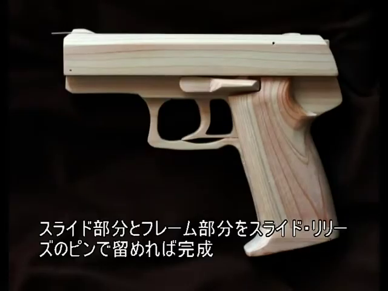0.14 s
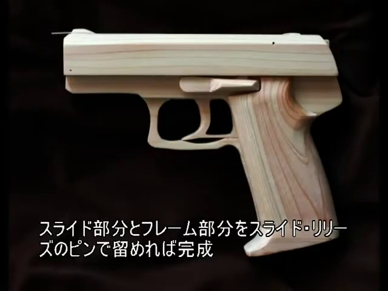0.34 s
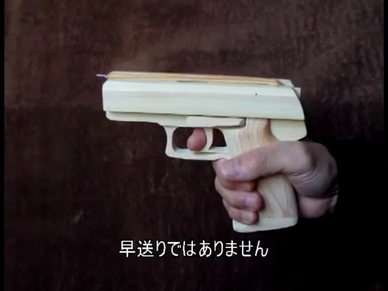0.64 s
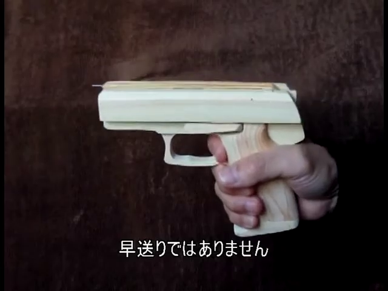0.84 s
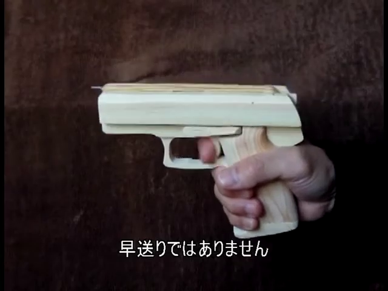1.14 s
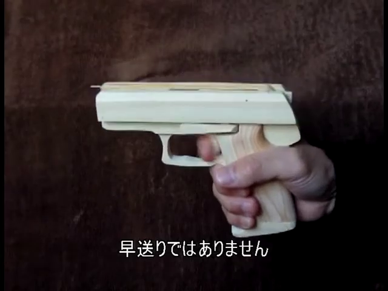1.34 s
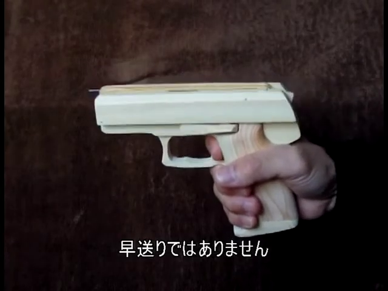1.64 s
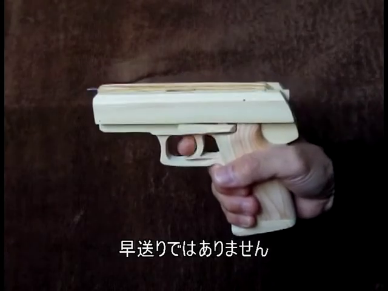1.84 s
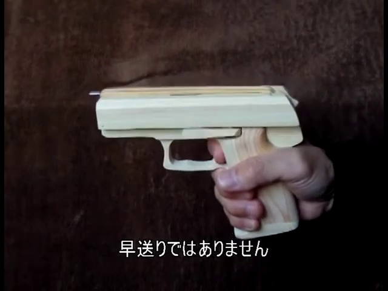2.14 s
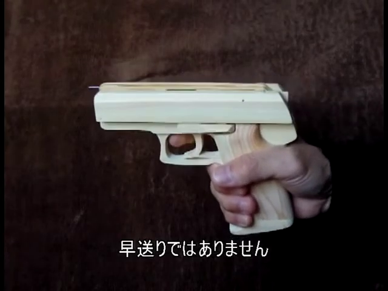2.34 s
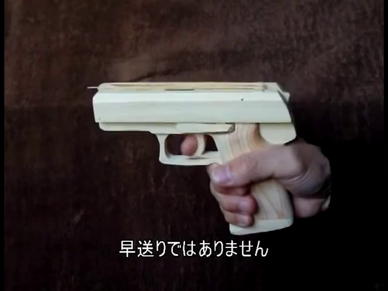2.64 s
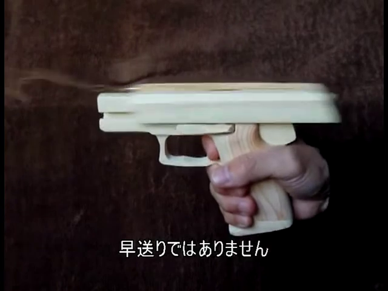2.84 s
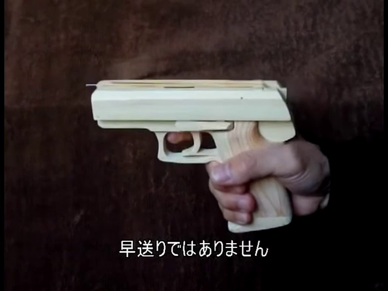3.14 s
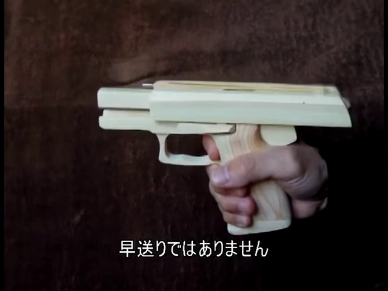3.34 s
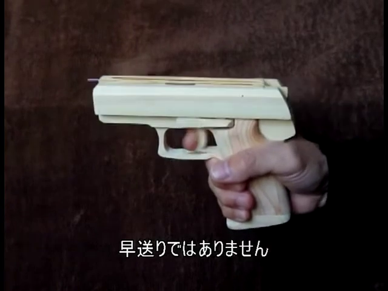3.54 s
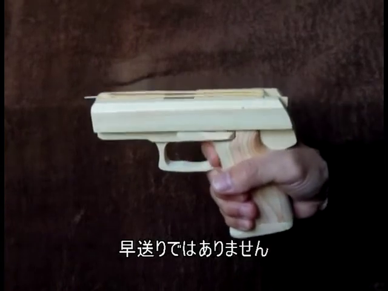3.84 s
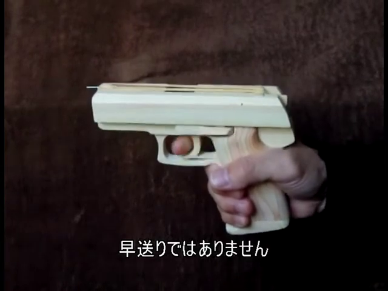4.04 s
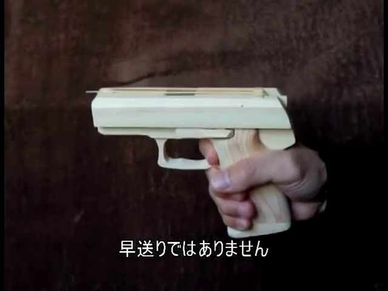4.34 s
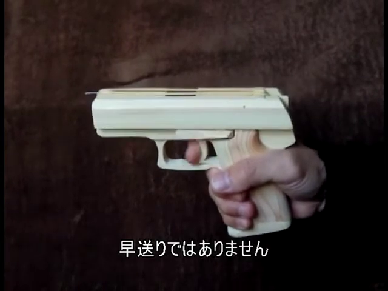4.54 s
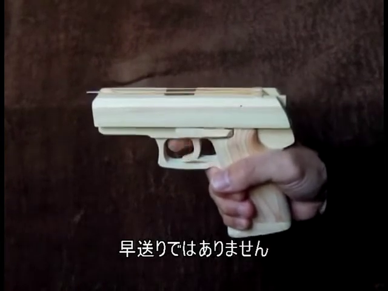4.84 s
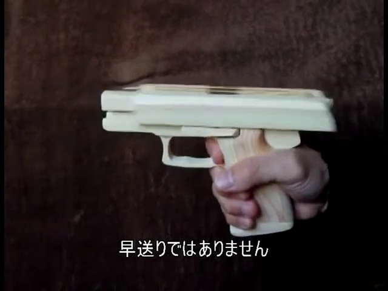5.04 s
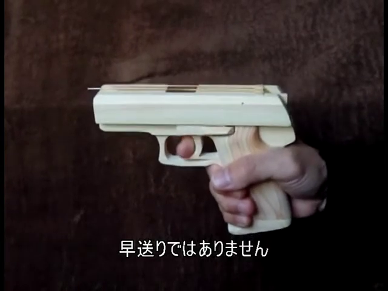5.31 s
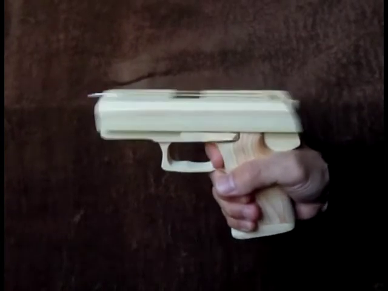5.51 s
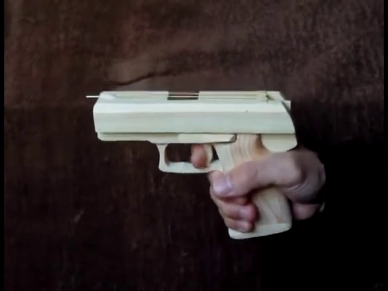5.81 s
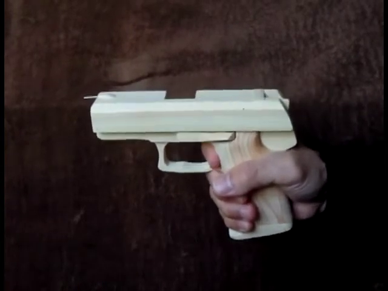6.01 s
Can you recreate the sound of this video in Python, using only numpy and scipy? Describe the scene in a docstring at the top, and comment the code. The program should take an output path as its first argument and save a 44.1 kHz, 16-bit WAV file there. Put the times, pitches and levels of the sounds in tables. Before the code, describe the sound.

Silence until 0.4 s, then a noticeable swell of room hiss and low rumble, which drops sharply around 0.85 s and later settles faintly underneath. From about 0.73 s a wooden repeating rubber band pistol fires very close by. Thirteen shots crack at roughly 0.8, 1.2, 1.6, 2.1, 2.5, 2.9, 3.4, 3.8, 4.2, 4.6, 5.1, 5.5 and 5.9 s. Each begins with small trigger clicks and a catch slipping, then a loud, bright wooden snap and gritty slide rattle. About a tenth of a second later the slide slams home with an equally hard clack, followed by a lighter double click as the trigger springs forward. Hollow low thuds color some cycles, strongest near 2.2 and 2.6 s. A short, bright room reverberation follows every knock; the loudest hits, especially at 3.8 s, clip harshly. The last reset clicks at 6.14 s, just before the end.

```python
"""Room hum starts at 0.4 s: hiss plus rumble, shaped noise on level curves, dipping at 0.85 s.
From 0.73 s a wooden repeating rubber band pistol fires 13 fast shots close by: trigger, catch, release,
slide rattle and return. Each knock is a noisy contact force ringing decaying modes of wood, hollow and edge.
The room answers each knock after 10 ms with decaying noise. Low hollow thuds (panel modes) join in, the
first just before the first shot. The loudest knocks overload the input and clip."""
import sys
import numpy as np
from scipy import signal
from scipy.fft import rfft, irfft
from scipy.io import wavfile
from scipy.ndimage import uniform_filter1d

SR = 44100
rng = np.random.default_rng(int(sys.argv[2]) if len(sys.argv) > 2 else 0)


def to_wav(s):
    """Save 16-bit WAV."""
    ch = np.atleast_2d(s).T  # columns
    pcm = np.round(np.clip(ch, -1, 1) * 32767)  # PCM
    wavfile.write(sys.argv[1], SR, pcm.astype(np.int16))


N = 272097
ROOM_DRAWS = 5  # random room answers that the knocks take turns through

# room answer bands: f/Hz, t60/s, relative level/dB, left-right likeness/0-1
ROOM_BANDS = [(248, 0.65, -2, 0.83), (540, 0.43, -9, 0.75), (1000, 0.2, 3, 0.85), (2160, 0.22, 8, 0.54),
              (3700, 0.24, 6.5, 0.4), (7560, 0.23, 8.5, 0.16), (11800, 0.23, 6, 0.06)]


def undb(db):
    """Decibels to gain."""
    return 10 ** (np.asarray(db) / 20)


def unit(x):
    """Scale to rms 1."""
    return x / np.sqrt(np.mean(x ** 2))


def decay(t, t60):
    """Exponential decay by 60 dB in t60 seconds."""
    return np.exp(-np.log(1000) * t / t60)


def shaped(x, gain):
    """Filter by a gain given as a function of frequency."""
    size = x.shape[-1]
    f_hz = np.fft.rfftfreq(size, 1 / SR) + 1  # +1 keeps log(f) finite
    return irfft(rfft(x) * gain(f_hz), size)


def likeness(f):
    """Two close microphones agree in the bass and differ in the treble."""
    hz, _, _, like = np.transpose(ROOM_BANDS)
    return np.interp(np.log(f), np.log(hz), like)


def pair(size, like):
    """Left and right noise from mid and side, weighted by a likeness over frequency."""
    mid, side = rng.standard_normal((2, size))
    mid = shaped(mid, lambda f: np.sqrt(1 + np.clip(like(f), 0, 1)))
    side = shaped(side, lambda f: np.sqrt(1 - np.clip(like(f), 0, 1)))
    return np.array([mid + side, mid - side]) / np.sqrt(2)


def lumpy(shape, step, lump_db):
    """Random gains stepping every step samples, edges smoothed: uneven lumps instead of an even hiss."""
    held = rng.standard_normal((*shape[:-1], shape[-1] // step + 1))
    steps = np.repeat(held, step, axis=-1)
    smooth = uniform_filter1d(steps, step // 2)[..., :shape[-1]]
    return undb(lump_db * smooth)


def ring(modes, chance, t, favoured_hz=0, lean_db=0.0, scatter_db=3.5, detune=.05):
    """Decaying sine modes, reweighted and shifted at random per blow; a blow may favour one pitch region."""
    hz, db, t60 = np.transpose(modes)[:, :, None]
    pick, shift = chance[:len(modes), None], chance[-len(modes):, None]
    pitch_hz = hz * (1 + detune * shift)
    octaves_off = np.abs(np.log2(hz / (favoured_hz or hz)))
    db = db + scatter_db * pick - lean_db * octaves_off
    return (undb(db) * decay(t, t60) * np.sin(2 * np.pi * pitch_hz * t)).sum(axis=0)


def hum():
    """Hiss and low rumble of the room: stereo noise, each with its own colour and level curve."""
    # level curves: t/s, hiss level/dB, rumble level/dB
    levels = [(.4, -26.5, -33), (.6, -22, -27.5), (.8, -20.5, -31.5), (.85, -55, -46), (1.05, -45, -38),
              (1.5, -36.5, -31.5), (2.6, -35.5, -32), (6.17, -34, -32)]
    # hiss colour: f/Hz, relative level/dB
    hiss_colour = [(88, -35), (150, 5), (743, 3), (897, 7.5), (986, 4), (2130, -5), (2830, -8.5),
                   (5070, -13.5), (11600, -14), (13500, -41)]
    # rumble colour: f/Hz, relative level/dB
    rumble_colour = [(12, -9), (22, -3.5), (42, 1.5), (65, -10), (95, -1.5), (125, -12.5), (200, -14.5),
                     (400, -51)]
    start_s = .402
    t = np.arange(N) / SR
    s, *levels_db = np.transpose(levels)
    out = 0
    for colour, level_db in zip((hiss_colour, rumble_colour), levels_db):
        hz, db = np.transpose(colour)
        air = unit(shaped(pair(N, likeness), lambda f: undb(np.interp(np.log(f), np.log(hz), db))))
        out = out + air * undb(np.interp(t, s, level_db))
    return out * (t > start_s)


def room(x):
    """After a short gap a lumpy noise tail rises quickly and decays at its own rate per band."""
    gap_s, rise_s, total_db = 0.01, 0.0033, 7
    t = np.arange(int(.5 * SR)) / SR
    noise, answer = pair(len(t), likeness), 0
    centres = np.log(np.transpose(ROOM_BANDS)[0])
    for k, (_, t60, db, _) in enumerate(ROOM_BANDS):
        only_this = np.arange(len(ROOM_BANDS)) == k
        band = shaped(noise, lambda f: np.interp(np.log(f), centres, only_this))
        answer = answer + undb(db) * band * decay(t, t60)
    answer *= lumpy(t.shape, step=170, lump_db=2.8)
    answer *= np.clip((t - gap_s) / rise_s, 0, 1)
    answer *= undb(total_db) / np.sqrt(np.sum(answer ** 2) / 2)
    return signal.fftconvolve(answer, x[None], axes=1)[:, :N]


def thuds(lean_db=13.0):
    """Hollow panel modes bloom softly and hum on; each thud favours some of them."""
    # low hollow thuds, the first just before the first shot:
    # t/s, boom level/dB, favoured boom f/Hz, knock level/dB, favoured knock f/Hz, bloom/ms
    thud_rows = [(.77, -38, 375, -10.5, 890, 6.2), (1.72, -20.5, 285, -4.5, 1000, 2.9),
                 (2.207, -9.5, 363, -5, 770, 4.8), (2.649, -9, 285, 3.5, 680, 3.9),
                 (3.087, -18.5, 302, -12, 900, 16), (4.406, -27, 375, -9.5, 960, 11),
                 (4.844, -20.5, 420, -16.5, 890, 7.6), (5.701, -17.5, 287, -14.5, 850, 5),
                 (6.066, -18, 393, -4.5, 960, 5.3)]
    # panel boom modes: f/Hz, relative level/dB, t60/s
    boom_modes = [(202.4, 0, 0.17), (242, -3.5, 0.21), (285, -1, 0.21), (326, -7, 0.063), (375, -1.5, 0.23),
                  (412.8, -1, 0.27), (474, -11, 0.29)]
    # panel knock modes: f/Hz, relative level/dB, t60/s
    knock_modes = [(566.6, -5.5, 0.19), (639, -7, 0.21), (687, -3, 0.076), (770, -4, 0.18),
                   (850, -1.5, 0.093), (897.6, 9, 0.063), (1008, 7, 0.053)]
    t = np.arange(16384) / SR
    out = np.zeros(N + len(t))
    chance = rng.standard_normal((len(thud_rows), 2, 14))
    for (s, boom_db, boom_hz, knock_db, knock_hz, bloom_ms), c in zip(thud_rows, chance):
        bloom = 1 - np.exp(-t * 1000 / bloom_ms)
        at = int(s * SR)
        for modes, db, hz, r in ((boom_modes, boom_db, boom_hz, c[0]), (knock_modes, knock_db, knock_hz, c[1])):
            thud = bloom * ring(modes, r, t, hz, lean_db, scatter_db=1.5, detune=.015)
            out[at:at + len(t)] += undb(db) * thud / np.abs(thud).max()
    return out[:N]


def blows():
    """Every knock in time order: t/s, level/dB, favoured f/Hz, hollow/dB, treble/dB, room share/dB, rattle/ms."""
    # finger takes up the slack: t/s, level/dB
    take_ups = [(.7328, -20), (1.1377, -31.5), (1.5063, -30), (2.846, -16.5), (3.2456, -20), (3.7182, -31),
                (4.1345, -24), (4.555, -21.5), (4.975, -19), (5.3956, -17), (5.813, -20)]
    # trigger moves, double click: t/s, first level/dB, gap/ms, second level/dB
    pulls = [(.7506, -11, 8.8, -14), (1.1647, -21, 10.3, -14.5), (1.5465, -13, 11.6, -7),
             (1.962, -16.5, 8.7, -11.5), (2.467, -14, 9.5, -8), (2.858, -13.5, 9.8, -9.5),
             (3.2658, -12, 10.6, -12), (3.7448, -13, 9.5, -8.5), (4.1701, -12.5, 8.9, -8.5),
             (4.5855, -13.5, 8.5, -10), (5.002, -14, 8.9, -10.5), (5.425, -14, 9.9, -9.5),
             (5.8413, -16.5, 9.3, -11.5)]
    # catch slips: t/s, level/dB, favoured f/Hz
    catches = [(.7802, -4, 1370), (1.2134, -22, 3090), (1.5947, -6, 3820), (2.0058, -13, 3580),
               (2.013, -19, 2290), (2.0804, -16, 3210), (2.5103, -12, 3290), (2.523, -3.5, 2600),
               (2.9015, -10.5, 3590), (2.9147, -1.5, 2820), (3.3122, -8.5, 3290), (3.3243, -7.5, 2050),
               (3.7925, -7.5, 3700), (3.8007, -15, 1810), (4.204, -17, 1530), (4.218, -12, 3430),
               (4.6194, -14, 1890), (4.6338, -8, 4000), (5.0348, -16, 1670), (5.0489, -9, 3830),
               (5.472, -9, 3640), (5.4792, -15, 2050), (5.8904, -6.5, 4320)]
    # band lets go, slide kicked back: t/s, level/dB, favoured f/Hz, rattle/ms
    releases = [(.7948, 3, 4000, 2), (1.2199, 0, 3050, 2.6), (1.606, 6.5, 3020, 1.4),
                (2.0926, 5.5, 2000, 4.9), (2.5421, 3, 1760, 2.9), (2.9289, 4, 2100, 3),
                (3.3815, 7.5, 2540, 4.5), (3.8125, 13.5, 2600, 1.3), (4.229, 8, 3530, 2.6),
                (4.6462, 10, 2710, 1.5), (5.0619, 8, 2850, 4.6), (5.4925, 4, 2950, 1.3),
                (5.9042, 8, 3500, 1.4)]
    # slide and other loose parts rattle after the blows: t/s, level/dB, favoured f/Hz, treble/dB, room
    # share/dB, rattle/ms
    loose_rattles = [(0.8032, 6.5, 3700, 10, -10, 3.2), (1.2291, -0.5, 2800, 16, -32, 9.4),
                     (1.2446, -3, 3410, 12, -5, 9.4), (1.618, 4, 2400, -5, -26, 9.9),
                     (1.6446, 2, 2940, 2.5, -7, 22), (2.1036, 1.5, 2930, 12, -17, 4.6),
                     (2.117, -1.5, 2600, 1, -6, 5.6), (2.3564, -12.5, 2860, 20, -17, .8),
                     (2.4154, -21, 2630, 17, -2.5, 13), (2.5659, 3, 1960, 3.5, -9, 10),
                     (2.9428, -10, 3900, 14, -14, 1.8), (2.9506, -2.5, 2200, 3, -5, 14),
                     (3.407, 2, 2260, 7, -7, 8.1), (3.8228, -6, 2490, 2, -13, 5.5),
                     (3.836, 0, 3090, 26, -9, 8.5), (3.8486, -10, 2360, -4, 4, 5.8),
                     (4.0546, -17, 2600, -3, -13, 2.3), (4.2419, 5.5, 3240, 35, -5.5, 6.4),
                     (4.2699, -0.5, 2080, -3, -5, 7.8), (4.4041, -7.5, 1810, 9, -5, 17),
                     (4.6562, 2, 2320, -22, -20, 7.8), (4.6824, 7, 3800, 5.5, -9.5, 20),
                     (4.7731, -4, 2310, 11, -2, 4.6), (4.9035, -13, 2470, 13, -14, 0.96),
                     (5.0723, 0, 2080, 9, -2, 17), (5.504, 6.5, 2980, 9.5, -25, 7.3),
                     (5.527, 4.5, 4460, 5, -9.5, 15), (5.9149, -1.5, 2460, 2, -17, 6.6),
                     (5.9258, 3.5, 3170, 8, -6, 8.5), (6.0649, -3, 1930, -4, -17, 5.3)]
    # dry tick just before the slide comes home: t/s, level/dB, favoured f/Hz, rattle/ms
    stops = [(.9073, -18, 2160, 1.7), (1.3203, -8.5, 2000, 1.5), (1.7105, 9.5, 1940, 0.79),
             (2.6333, -3, 1820, 1.1), (3.004, -7, 1970, 2.8), (3.019, -3.5, 1660, 2.9),
             (3.4498, -8, 2320, 7.4), (3.9108, -7, 1610, 1.2), (4.3367, -6, 1700, 1.4),
             (4.7452, 2, 1650, 1.3), (5.1619, -4.5, 1770, 0.79), (6.0018, -5.5, 2200, 1)]
    # slide slams home: t/s, level/dB, favoured f/Hz, rattle/ms
    returns = [(.9256, -3, 2700, 4.7), (1.3366, 2, 2470, 7.1), (1.7203, 4.5, 1780, 12),
               (2.2011, 4.5, 2410, 15), (2.6449, 3.5, 2080, 26), (3.0382, 4.5, 2400, 5.5),
               (3.496, 3, 3000, 9.2), (3.9275, 5.5, 2800, 16), (4.3565, 5, 2260, 8.4),
               (4.7621, 3, 2580, 16), (5.1792, 6, 2520, 8.6), (5.6154, 6, 2290, 6.3),
               (6.0155, 7.5, 1940, 7.2)]
    # trigger springs forward, double click: t/s, first level/dB, gap/ms, second level/dB
    resets = [(1.016, -16.5, 13.5, -14.5), (1.4156, -10, 10.3, -11), (1.8112, -11.5, 9.4, -17),
              (2.3246, -13, 6.1, -5), (2.727, -7, 13.4, -10.5), (3.1284, -12.5, 13, -9.5),
              (3.6013, -14.5, 10, -9), (4.0223, -12.5, 9.1, -7), (4.4538, -22, 10.1, -9),
              (4.869, -9.5, 12, -10), (5.2752, -10.5, 8.8, -7), (5.7019, -9.5, 13.2, -6.5),
              (6.141, -12, 12.4, -7)]

    # colours of fixed-pitch kinds: favoured f/Hz, hollow/dB, treble/dB, room share/dB, rattle/ms
    take_up_colour = (1500, -3, -14, -22, 2.5)
    # same columns, rows: first click, second click
    pull_colours = (2700, 0, 0.5, -4, 3.1), (2100, -12, -9.5, -16.5, 1.5)
    reset_colours = (2400, -12, -5, -10, 4.5), (2400, -28, -6.5, -11, 4)
    # colours of kinds with a pitch per blow: hollow/dB, treble/dB, room share/dB
    release_colour = (-23, 2.2, -6)
    return_colour = (-49, 2.8, -8)
    stop_colour = (-35, -39, -16.5)
    catch_colour, catch_rattle_ms = (-15, -7, -10.5), 1.53
    loose_rattle_hollow_db = -14

    rows = [(*row, *take_up_colour) for row in take_ups]
    for table, (first, second) in ((pulls, pull_colours), (resets, reset_colours)):
        for s, db, gap_ms, next_db in table:
            rows += [(s, db, *first), (s + gap_ms / 1000, next_db, *second)]
    rows += [(*row, *catch_colour, catch_rattle_ms) for row in catches]
    for table, colour in ((releases, release_colour), (stops, stop_colour), (returns, return_colour)):
        rows += [(s, db, hz, *colour, ms) for s, db, hz, ms in table]
    rows += [(s, db, hz, loose_rattle_hollow_db, *rest) for s, db, hz, *rest in loose_rattles]
    return sorted(rows)


def rattles(decays_ms, rise_ms, lump_db):
    """Contact forces: a quick rise, then small uneven impacts that die away."""
    ms = np.arange(2048) / SR * 1000
    size = (len(decays_ms), len(ms))
    rough = rng.standard_normal(size) * lumpy(size, step=48, lump_db=lump_db)
    rise = 1 - np.exp(-(ms / rise_ms) ** 2)
    return rough * rise * np.exp(-ms / np.maximum(decays_ms, .3)[:, None])


def knocks(grit_db=-6.5, grit_follows=0.31, lean_db=14.5, radiate_hz=600):
    """Rough wood meets wood and rings the parts; returns the direct sound and the feed of each room answer."""
    # wood of slide and frame: f/Hz, relative level/dB, t60/s
    wood = [(1413, -14.5, 0.047), (1680, -17.5, 0.021), (2145, -12, 0.015), (2600, -10, 0.0093),
            (3240, -4, 0.0043), (3964, -0.5, 0.0059), (4290, 2, 0.009), (5000, 2, 0.0018)]
    # hollow of frame and grip: f/Hz, relative level/dB, t60/s
    hollow = [(620, -25, 0.027), (770, -5.5, .03), (953, 54, 0.05), (960, 2, 0.015)]
    # bright edge of the crack: f/Hz, relative level/dB, t60/s
    edge = [(5530, 6.5, 0.0023), (6700, 11.5, 0.0021), (8070, 2.5, 0.0081), (8850, -41, 0.00068),
            (10160, 12.5, 0.002), (11330, 16.5, 0.0022)]
    t = np.arange(4096) / SR
    direct, sent = np.zeros(N + len(t)), np.zeros((ROOM_DRAWS, N + len(t)))
    rows = blows()
    chance = rng.standard_normal((len(rows), 3, 16))
    pushes = rattles(np.transpose(rows)[-1], rise_ms=1.1, lump_db=3.0)
    for k, (s, db, hz, hollow_db, treble_db, room_db, _) in enumerate(rows):
        wood_ring = ring(wood, chance[k, 0], t, hz, lean_db)
        hollow_ring = ring(hollow, chance[k, 1], t)
        edge_ring = ring(edge, chance[k, 2], t)
        body = unit(wood_ring) + undb(hollow_db) * unit(hollow_ring) + undb(treble_db) * unit(edge_ring)
        # grit: the unresonant part of the contact, weaker in dull knocks
        body[0] += undb(grit_db + grit_follows * min(treble_db, 0)) * np.sqrt(len(t))
        blow = signal.fftconvolve(body, pushes[k])[:len(t)]
        loudest_power = uniform_filter1d(blow ** 2, size=88).max()  # 2 ms window
        blow *= undb(db) / np.sqrt(2 * loudest_power)
        at = int(s * SR)
        direct[at:at + len(t)] += blow
        # the walls get the knock's own ring, without its rough rattle
        sent[k % ROOM_DRAWS, at:at + len(t)] += undb(room_db) * unit(body) * blow.std()
    # a small object radiates little bass
    small = signal.butter(2, radiate_hz, "high", fs=SR, output="sos")
    return signal.sosfilt(small, direct[:N]), signal.sosfilt(small, sent[:, :N])


def spread(direct):
    """Spaced capsules hear the treble of the close sound with opposite phase turns."""
    share, half_hz = 1.2, 3000  # side share limit, half reached at half_hz
    side = shaped(direct, lambda f: share * f / (f + half_hz))
    turned = np.imag(signal.hilbert(side))
    return direct + turned * np.array([[1], [-1]])


def scene():
    """Close knocks, their room answer, thuds and hum, a little louder on the left."""
    thud_room_db, balance_db = -8.5, 0.5  # balance: up on the left, down on the right
    direct, sent = knocks()
    close = spread(direct)
    panel = thuds()
    sent[0] += undb(thud_room_db) * panel
    # knocks take turns through the random room answers, so no echo pattern repeats each time
    walls = sum(room(x) for x in sent)
    return (close + panel + walls + hum()) * undb([[balance_db], [-balance_db]])


def record(dry):
    """The capsules fade steeply near 13 kHz, the input clips hard and the top is cut."""
    heard = shaped(dry, lambda f: 1 / np.sqrt(1 + (f / 12700) ** 30))
    clipped = np.clip(heard, -.97, .97)
    softened = shaped(clipped, lambda f: 1 / np.sqrt(1 + (f / 13200) ** 8))
    top_cut = signal.ellip(4, .2, 12, 14050, fs=SR, output="sos")  # ripple/dB, stopband/dB, edge/Hz
    return signal.sosfilt(top_cut, softened)


dry = scene()
out = record(dry)
to_wav(out)
```